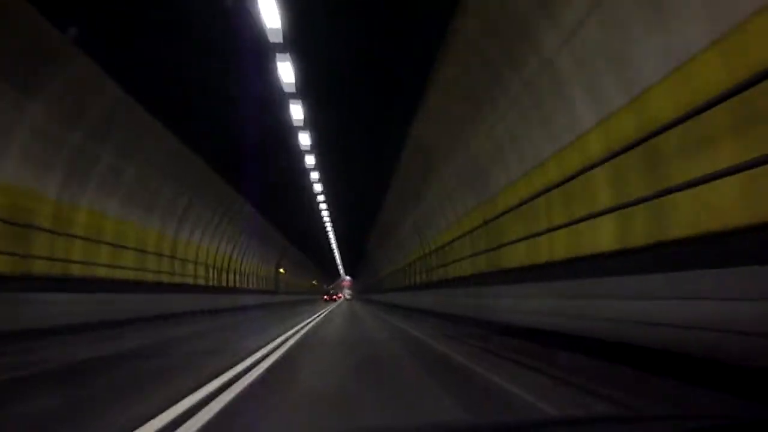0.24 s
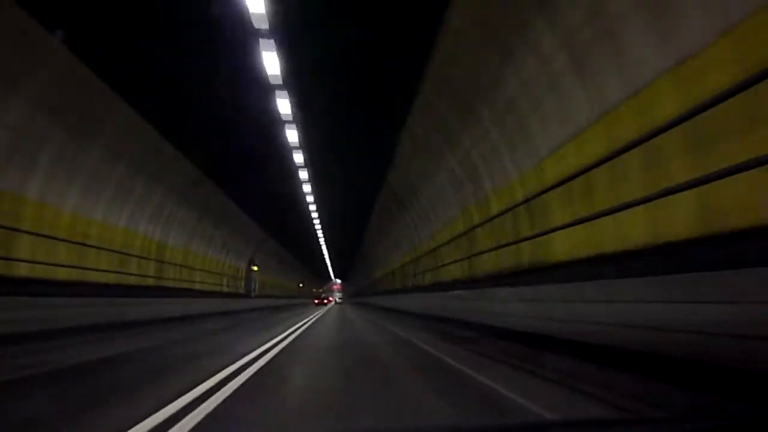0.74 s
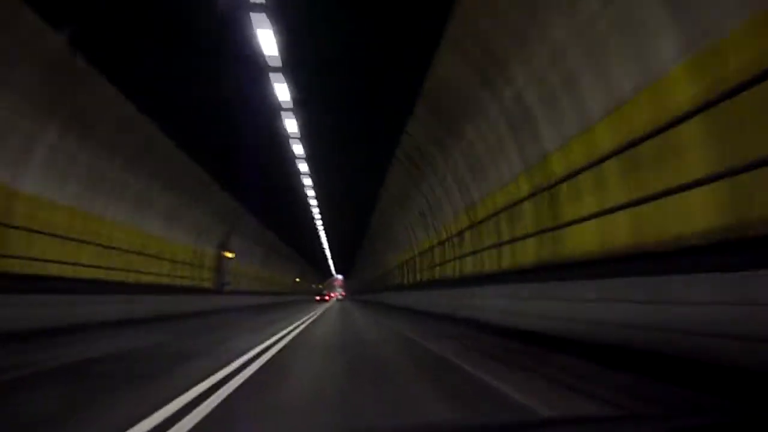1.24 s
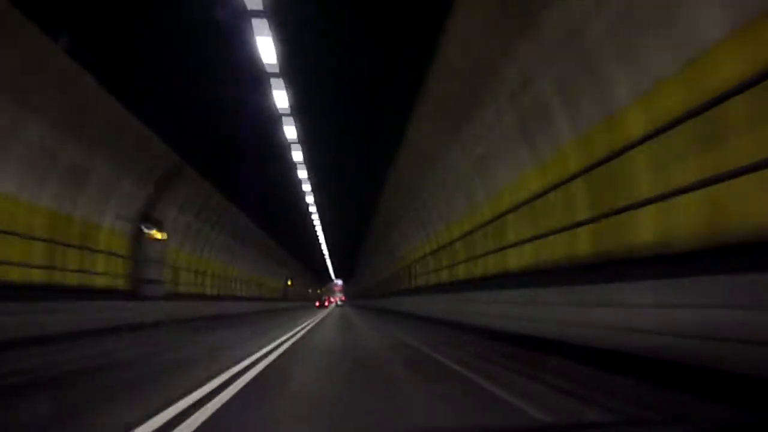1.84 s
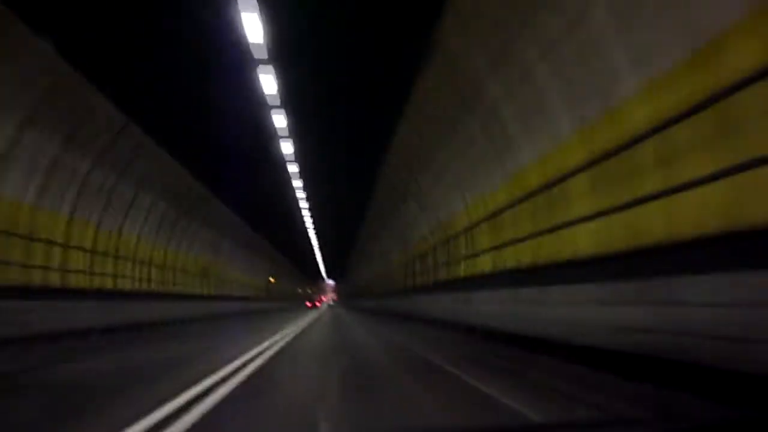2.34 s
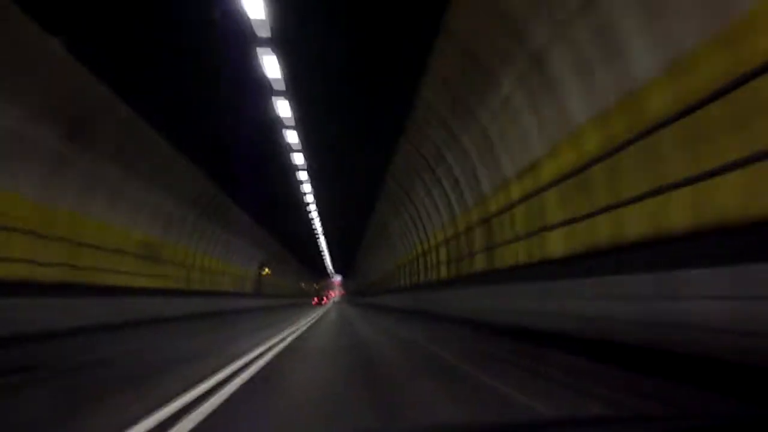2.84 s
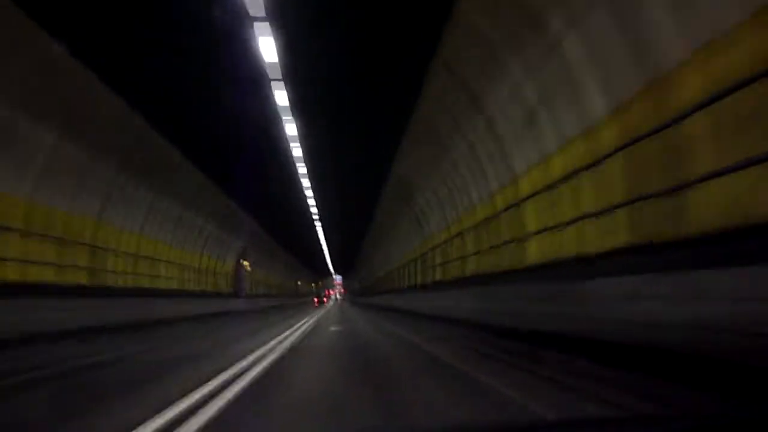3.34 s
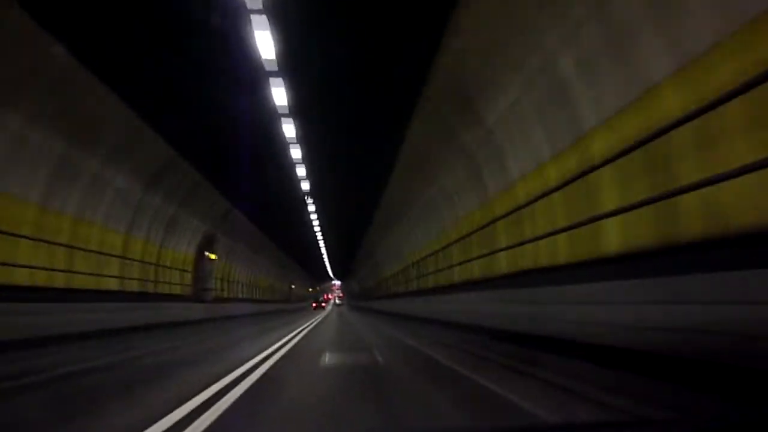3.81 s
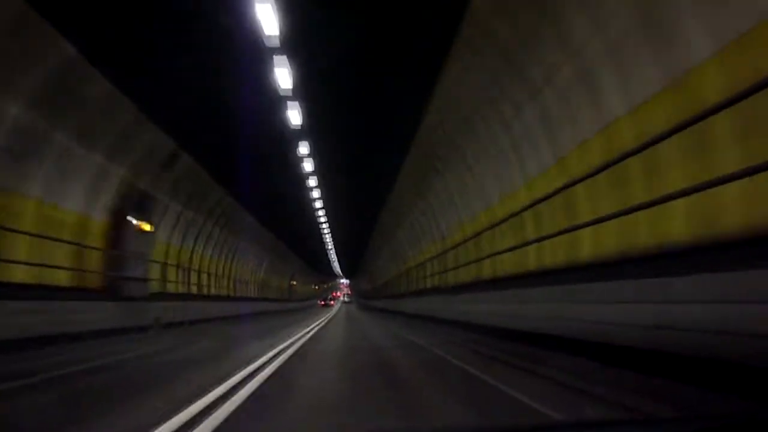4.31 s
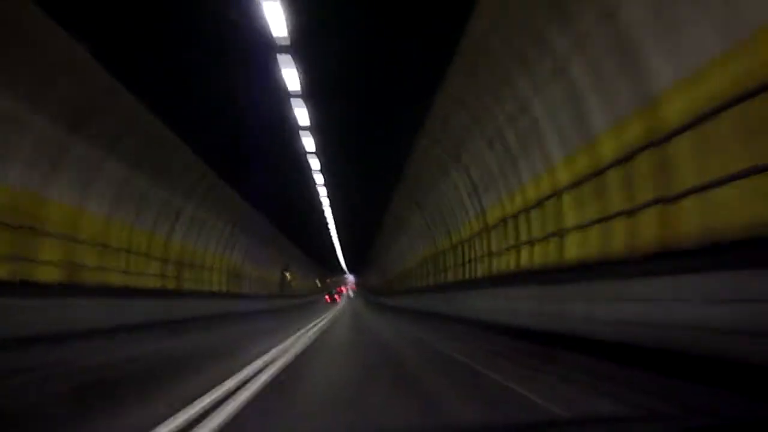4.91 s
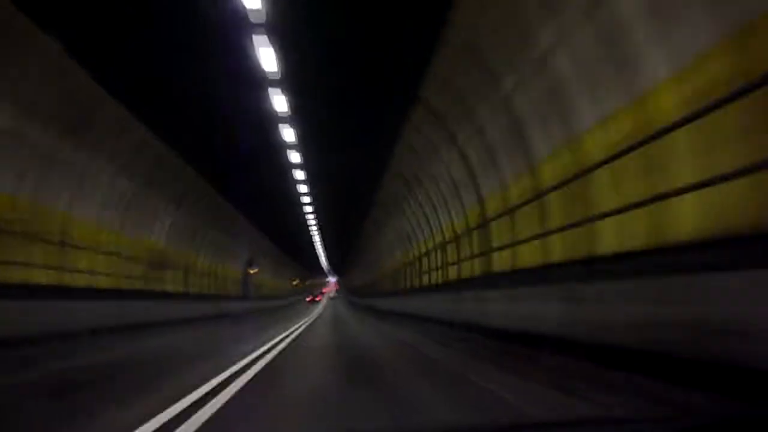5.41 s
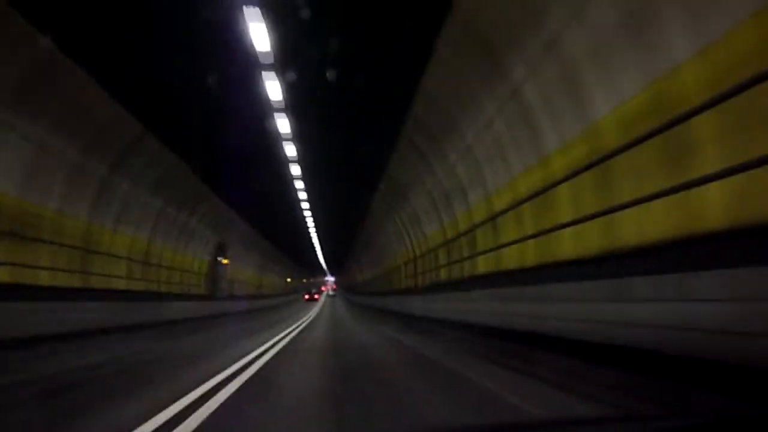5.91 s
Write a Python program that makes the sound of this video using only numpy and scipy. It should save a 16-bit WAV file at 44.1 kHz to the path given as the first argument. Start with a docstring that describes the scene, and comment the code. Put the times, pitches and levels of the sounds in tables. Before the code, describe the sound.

Inside a car cruising through a road tunnel with the windows closed, a deep, steady road rumble fills the cabin. Muffled tyre roar comes back from the walls, and a low tyre hum and brief low tones swell and fade. Small bumps add soft thuds and faint ticks of loose plastic trim, over a very faint hiss of air. The microphone sits at the dashboard.

```python
"""Inside a car cruising through a road tunnel, windows closed, one microphone at the dashboard.
Air hisses faintly along the doors and loose trim ticks and rustles on the bumps. Tread roar comes
back from the tunnel walls through the glass, and the air in the tyres hums. Closest and loudest,
the road shakes the body: the panels drum and the cabin booms in its modes.
Brief low tones swell out of this rumble and sink back."""
import sys
import numpy as np
from scipy import signal
from scipy.fft import rfft, irfft
from scipy.io import wavfile
from scipy.ndimage import uniform_filter1d

SR = 44100
rng = np.random.default_rng(int(sys.argv[2]) if len(sys.argv) > 2 else 0)


def generate_wav(signal):
    """Clip the signal to [-1, 1] and save it as 16-bit WAV at the path in sys.argv[1]."""
    frames = np.transpose(np.atleast_2d(signal))
    scaled = np.clip(frames, -1, 1) * 32767
    pcm = np.round(scaled).astype(np.int16)
    wavfile.write(sys.argv[1], SR, pcm)


N = 271656
TIME = np.arange(N) / SR
FREQS = np.fft.rfftfreq(N, 1 / SR)


def gain_of(db):
    """Decibels to amplitude."""
    return 10 ** (np.asarray(db) / 20)


def unit_rms(x):
    """Scales to rms 1."""
    return x / np.sqrt(np.mean(x ** 2) + 1e-20)


def colour(points):
    """Gain at every frequency from a short spectrum."""
    hz, db = np.transpose(points)
    return gain_of(np.interp(np.log(FREQS + 1), np.log(hz + 1), db))


def below(hz):
    """Gain of a smooth, steep low-pass."""
    return 1 / (1 + (FREQS / hz) ** 8)


def resonance(hz, width):
    """Gain of one resonance."""
    return 1 / (1 + ((FREQS - hz) / width * 2) ** 2)


def filtered(x, gain):
    """Applies a gain for every frequency."""
    return irfft(rfft(x) * gain, N)


def noise(gain):
    """Noise of rms 1 with the given spectrum."""
    return unit_rms(filtered(rng.standard_normal(N), gain))


def steadied(x):
    """Holds the slow level of a noise at 1 and keeps its fast flutter."""
    window = np.hanning(9000)
    weight = signal.fftconvolve(np.ones(N), window, "same")
    for _ in range(3):
        x = x / np.sqrt(signal.fftconvolve(x ** 2, window, "same") / weight + 1e-12)
    return x


def follow(curve):
    """A level curve at every sample."""
    return np.interp(TIME, *np.transpose(curve))


def swell(s, length):
    """A smooth rise and fall around the time s."""
    return np.exp(-(2 * (TIME - s) / length) ** 2)


def burst(s, t60, rise_s=0.0007):
    """A quick rise at the time s, then a decay."""
    age = np.maximum(TIME - s, 0)
    return (1 - np.exp(-age / rise_s)) * gain_of(-60 * np.minimum(age / t60, 2))


def drone(hz, waver_hz, flutter_db, rate_hz=6):
    """A held tone whose pitch and level waver at random."""
    pitch = hz + waver_hz * noise(below(rate_hz))
    phase = 2 * np.pi * (np.cumsum(pitch) / SR + rng.random())
    return np.sqrt(2) * np.sin(phase) * gain_of(flutter_db * noise(below(rate_hz)))


# air rushing past the door seals, far in the background (f/Hz, level/dB)
WIND_SPECTRUM = [(800, -7.5), (3400, -1), (5000, -2), (7000, -6.5), (9500, -21.5), (10700, -26.5),
                 (11600, -40), (15000, -41)]

def wind(level_db=-66):
    """At an even speed the air hisses steadily along the doors."""
    return gain_of(level_db) * noise(colour(WIND_SPECTRUM))


# dips and swells in the road under the car (t/s, thud level/dB, rustle level/dB)
ROAD_BUMPS = [(.37, -32, -81), (1.04, -33.5, -79), (2.28, -26, -71.5), (3.1, -30.5, -64.5),
              (4.54, -29, -74), (5.3, -33, -71), (5.82, -33, -77.5)]

def bumps(heave_s=0.65, rustle_s=0.3, smooth_road_db=-32):
    """Bumps work the suspension: envelopes for the heaving body and the rustling trim."""
    heave_power = sum((gain_of(db) * swell(s, heave_s)) ** 2 for s, db, _ in ROAD_BUMPS)
    heave = np.sqrt(gain_of(smooth_road_db) ** 2 + heave_power)
    rustle = sum(gain_of(db) * swell(s, rustle_s) for s, _, db in ROAD_BUMPS)
    return heave, rustle


# loose trim ticking in the cabin, near but faint (t/s, level/dB, t60/s)
TRIM_TICKS = [(1.1864, -53.5, .015), (2.1162, -56.5, .024), (2.1570, -50, 0.036), (2.2232, -44, 0.0077),
              (2.2574, -54.5, 0.012), (2.2925, -41.5, 0.0084), (2.9785, -53, .01), (3.024, -58.5, .03),
              (3.038, -59, .02), (3.087, -48, 0.015), (4.616, -44.5, 0.012), (5.1548, -42, 0.029),
              (5.2337, -53, 0.017), (5.665, -56, 0.021), (5.7466, -44.5, 0.013), (5.8478, -54, 0.0083)]
# colour of that plastic trim (f/Hz, level/dB)
TRIM_SPECTRUM = [(1500, -23.5), (3500, -2.5), (5000, 5), (6600, 2), (9500, -14.5), (11000, -27.5),
                 (12500, -44), (15000, -55.5)]

def trim(level_db=-1.5, rebound_s=0.0045, rebound_db=-10.5, buzz_db=-15, chatter_hz=110):
    """Loose plastic strikes, falls back to strike once more and buzzes on; on bumps it rustles."""
    strikes, buzz = np.zeros((2, N))
    for s, db, t60 in TRIM_TICKS:
        strikes += gain_of(db) * (burst(s, t60) + gain_of(rebound_db) * burst(s + rebound_s, t60))
        buzz += gain_of(db + buzz_db) * burst(s, t60=0.3)
    contact = np.minimum(noise(below(chatter_hz)) - 1.5, 0)  # uneven contact cuts dips in the level
    ticks = gain_of(level_db) * (strikes + buzz * gain_of(8 * contact))
    _, rustle = bumps()
    return (ticks + rustle * gain_of(4.5 * contact)) * noise(colour(TRIM_SPECTRUM))


# hum of the tyres, heard from inside the car (t/s, level/dB)
HUM_LEVEL = [(0, -42), (.5, -24.5), (.95, -40), (1.4, -27.5), (2.05, -28), (2.65, -48.5), (3.05, -21),
             (3.4, -29), (3.7, -25.5), (4.4, -37.5), (5.0, -27), (5.3, -22.5), (5.6, -38), (6.16, -33)]

def tyre_hum(level_db=-1.5, cavity_hz=251.9):
    """The air inside the tyres rings at one pitch, swelling and fading with the asphalt."""
    return gain_of(level_db + follow(HUM_LEVEL)) * drone(cavity_hz, waver_hz=1.5, flutter_db=2.3)


# tread roar off the tunnel walls, heard behind closed windows (f/Hz, level/dB)
ROAR_SPECTRUM = [(180, -6.5), (345, 2.5), (500, 0.5), (600, 2), (720, 2.4), (790, 1.9), (870, 1.75),
                 (1000, 0.5), (1110, -4), (1220, -6.5), (1330, -12.5), (1650, -19), (2000, -25),
                 (2600, -28.5), (3400, -35.5), (5000, -47.5), (9500, -71.5), (12000, -91.5)]
# body of the roar over smoother and coarser asphalt (t/s, level/dB)
ROAR_BODY_LEVEL = [(0, -31), (.38, -31), (.8, -31.5), (1.17, -33.5), (1.39, -30.5), (1.85, -33),
                   (2.25, -33.5), (2.72, -30), (3.05, -31), (3.35, -33), (3.77, -28.5), (3.94, -33),
                   (4.13, -28), (4.35, -32), (4.53, -27.5), (4.72, -33), (5.05, -30.5), (5.45, -29.5),
                   (6.16, -29.5)]
# treble of the roar through the glass (t/s, level/dB)
ROAR_TREBLE_LEVEL = [(0, -40.5), (.4, -40), (.8, -40.5), (1.1, -43), (1.4, -40), (1.8, -42.5), (2.2, -44),
                     (2.75, -40), (3.35, -41), (4.05, -39.5), (4.3, -40.5), (5.0, -41.5), (5.42, -38.5),
                     (5.7, -39), (5.88, -38), (6.16, -39)]

def tread_roar(body_db=3, split_hz=1350, flutter_db=0.8):
    """Tread blocks pump air against the asphalt; the walls return it as a fluttering roar."""
    roar = noise(colour(ROAR_SPECTRUM))
    dull = filtered(roar, below(split_hz))
    body = gain_of(body_db + follow(ROAR_BODY_LEVEL)) * steadied(dull)
    treble = gain_of(follow(ROAR_TREBLE_LEVEL)) * steadied(roar - dull)
    surface_db = flutter_db * noise(below(25) - below(3))
    return gain_of(surface_db) * (body + treble)


# brief low tones in the cabin's rumble (middle t/s, length/s, f/Hz, level/dB)
BOOM_TONES = [(0.205, 0.41, 146.6, -22.5), (1.047, 1.24, 175.3, -24), (.95, 0.28, 149, -25),
              (1.8, .7, 156, -21), (2.312, 0.41, 150, -22), (3.1, 0.31, 145, -24), (3.877, .3, 147.7, -19),
              (4.285, 0.3, 178, -22), (4.572, 0.29, 212, -18)]

def boom_tones(level_db=-2):
    """Brief low tones swell out of the rumble and sink back."""
    return sum(gain_of(level_db + db) * swell(s, length) * drone(hz, waver_hz=1.2, flutter_db=4)
               for s, length, hz, db in BOOM_TONES)


# cabin and panel resonances around the microphone (f/Hz, width/Hz, level/dB)
MODES = [(34.6, 6, -45), (51.2, 4.6, -42.5), (65, 3.5, -40), (88.5, 12, -39), (131.8, 4.9, -34),
         (147.4, 9.2, -25), (159, 19, -31), (183.3, 10, -29), (216.9, 5.3, -36), (237.6, 7.1, -39.5),
         (300.7, 18, -40), (347.4, 30, -42)]

def cabin_ring():
    """The cabin's modes, kept ringing by the random push of the road."""
    power = sum((gain_of(db) * unit_rms(resonance(hz, width))) ** 2 for hz, width, db in MODES)
    return filtered(rng.standard_normal(N), np.sqrt(power))


# road shake carried by the body into the cabin (f/Hz, level/dB)
SHAKE_SPECTRUM = [(12, -58.5), (24, -24.5), (33, -18.5), (74, -19), (88, -11.5), (125, -1), (160, 0.3),
                  (205, -3.5), (250, -5.5), (280, -14.5), (350, -15.5), (410, -20.5), (470, -31),
                  (700, -41), (1400, -94.5), (3000, -140)]
# growl from the wheel arches, the highest band of the shake (t/s, level/dB)
GROWL_LEVEL = [(0, -32.5), (.5, -29.5), (.7, -34), (.9, -29), (1.1, -35), (1.5, -30.5), (2.0, -31.5),
               (2.35, -32.5), (2.85, -32), (3.06, -26), (3.3, -32), (3.7, -28.5), (4.2, -29.5),
               (4.4, -27.5), (5.25, -31), (6.0, -27.5)]
# drumming of the panels close by, just above the boom (t/s, level/dB)
DRUM_LEVEL = [(0, -22.5), (.48, -24), (.75, -25), (1.2, -25), (1.6, -21), (2.3, -22.5), (2.8, -21),
              (3.0, -23), (3.5, -21.5), (3.75, -23.3), (4.25, -26), (4.6, -24), (4.9, -21.5), (5.7, -24),
              (6.05, -19)]
# boom of the cabin air, all around the microphone (t/s, level/dB)
BOOM_LEVEL = [(0, -20), (.4, -24), (.97, -19.5), (1.35, -23), (1.75, -23), (2.2, -22), (2.55, -25),
              (3.1, -18.5), (3.6, -23), (4.3, -20), (4.85, -21), (5.25, -23), (6.16, -23)]
# brief throbs in that boom (t/s, added level/dB)
BOOM_THROBS = [(.15, 6), (.255, 7), (0.443, 15.5), (0.581, 11.5), (.681, 3), (.833, 7), (1.02, 2.5),
               (1.699, 4), (2.187, 1), (3.88, 7.5), (4.624, 3)]

def road_rumble(deep_hz=92, panel_hz=198, arch_hz=280, drum_db=-4.54, throb_s=0.022, lumpy_db=0.93):
    """Road texture shakes the body: bumps thud, the cabin booms, panels drum, wheel arches growl."""
    shake = gain_of(-17) * noise(colour(SHAKE_SPECTRUM)) + cabin_ring()
    deep, low, middle = (filtered(shake, below(hz)) for hz in (deep_hz, panel_hz, arch_hz))
    heave, _ = bumps()
    thud = heave * steadied(deep)
    throb_db = sum(db * swell(s, throb_s) for s, db in BOOM_THROBS)
    throb_db -= uniform_filter1d(throb_db, size=20000)  # the boom sinks a little around each throb
    boom = gain_of(follow(BOOM_LEVEL) + throb_db) * steadied(low - deep)
    drum = gain_of(follow(DRUM_LEVEL) + drum_db) * steadied(middle - low)
    growl = gain_of(follow(GROWL_LEVEL)) * steadied(shake - middle)
    lumps = gain_of(lumpy_db * noise(below(hz=9)))
    return thud + lumps * (boom + drum + growl)


def scene():
    """Everything that reaches the dashboard, in mono."""
    return (road_rumble() + boom_tones() + tyre_hum() + tread_roar() + wind() + trim())[None]


# dips in the treble of the dashboard microphone (f/Hz, width/Hz)
MIC_NOTCHES = [(3005, 1090), (4410, 1300), (8000, 720)]

def record(dry):
    """A microphone with treble dips, a limited band and a constant offset; the end fades quickly."""
    edge_hz, offset, fade_s = 15000, -0.052, 0.003
    for hz, width in MIC_NOTCHES:
        dry = signal.lfilter(*signal.iirnotch(hz, hz / width, SR), dry)
    fade = np.sin(np.pi / 2 * np.minimum((TIME[-1] - TIME) / fade_s, 1)) ** 2
    band_limit = signal.butter(10, edge_hz, fs=SR, output="sos")
    return signal.sosfilt(band_limit, dry * fade) + offset


dry = scene()
out = record(dry)
generate_wav(out)
```